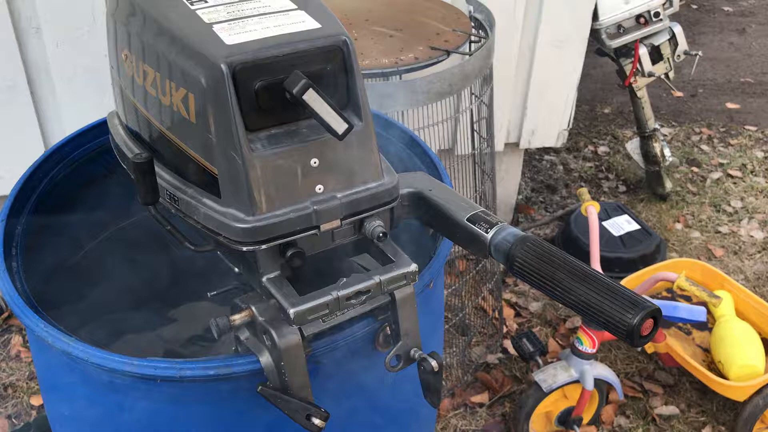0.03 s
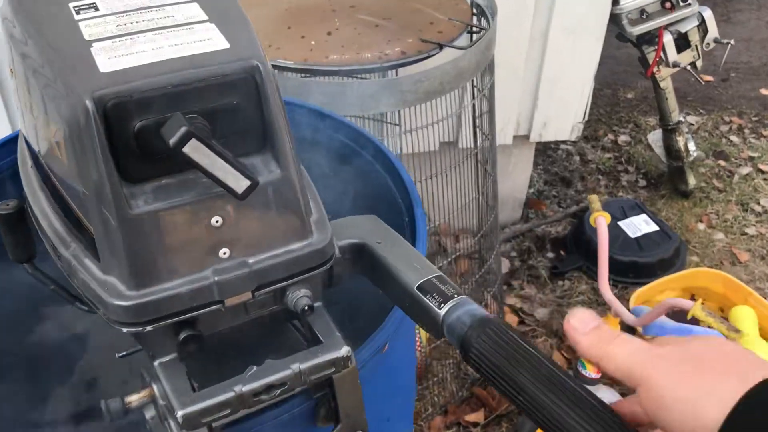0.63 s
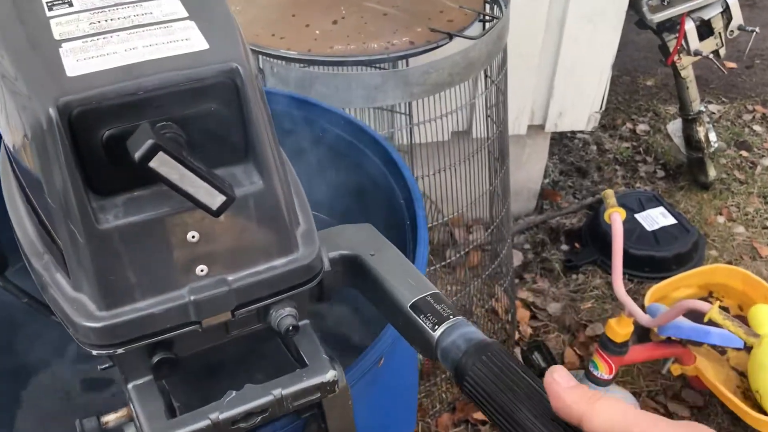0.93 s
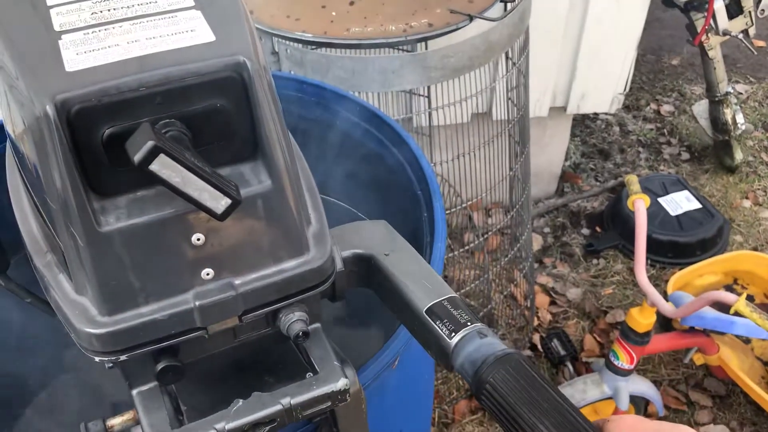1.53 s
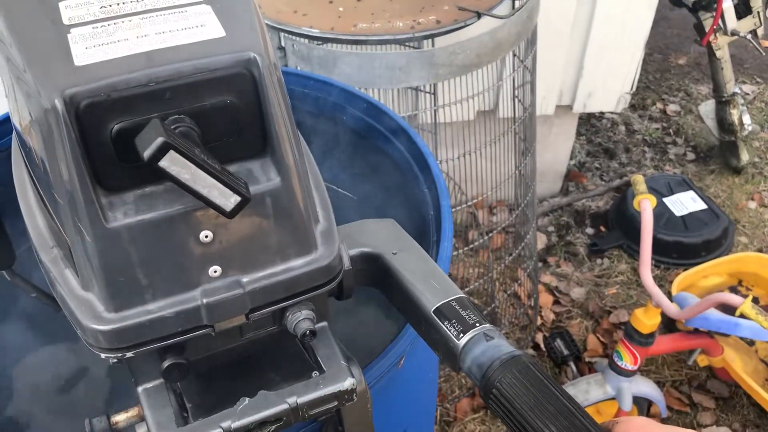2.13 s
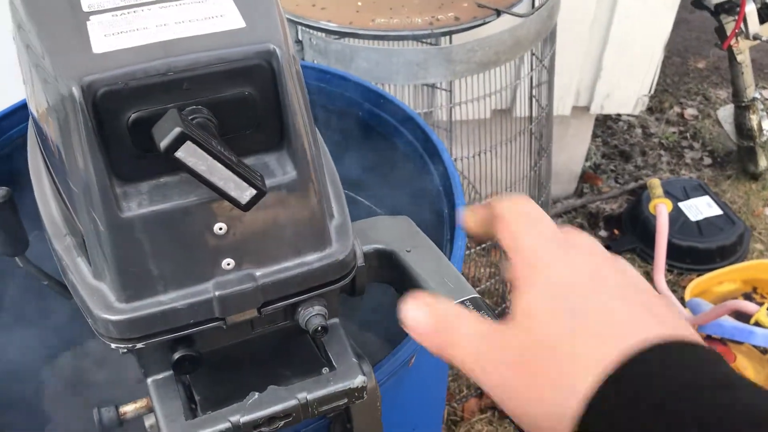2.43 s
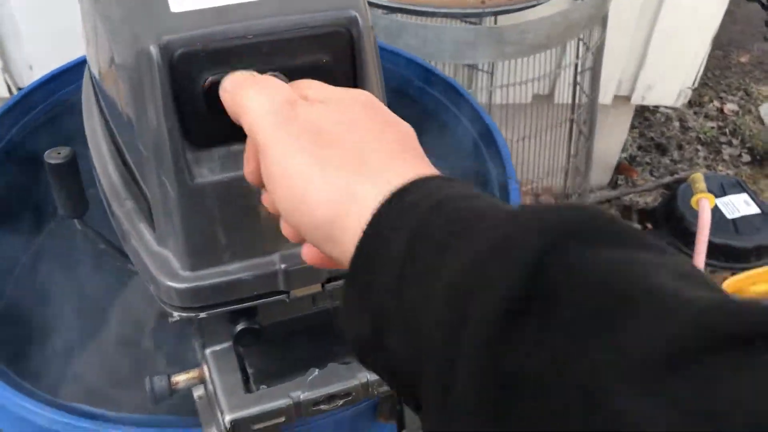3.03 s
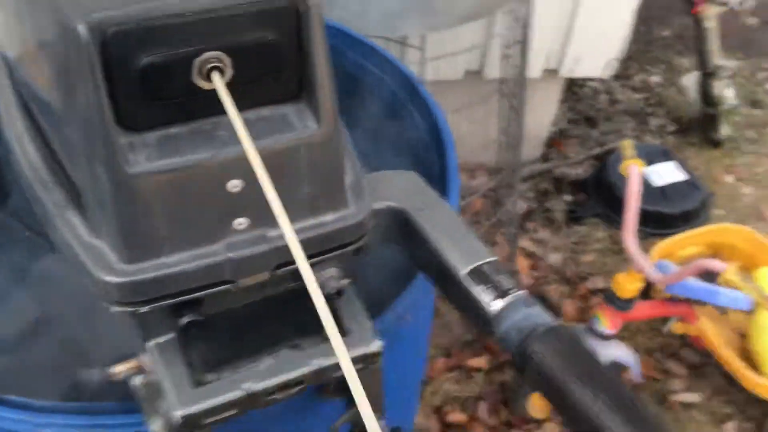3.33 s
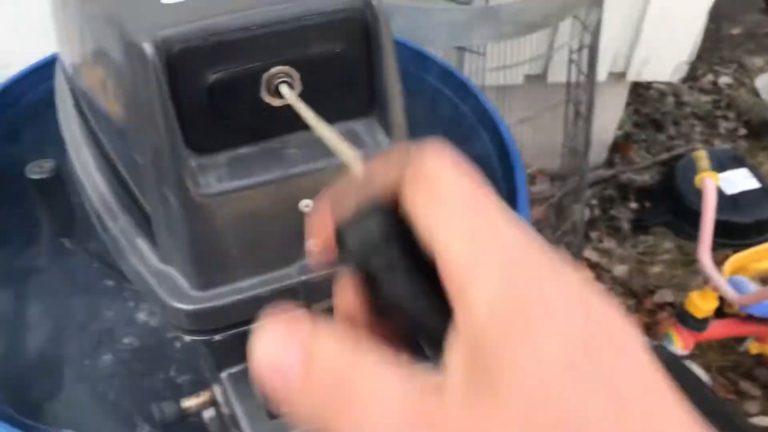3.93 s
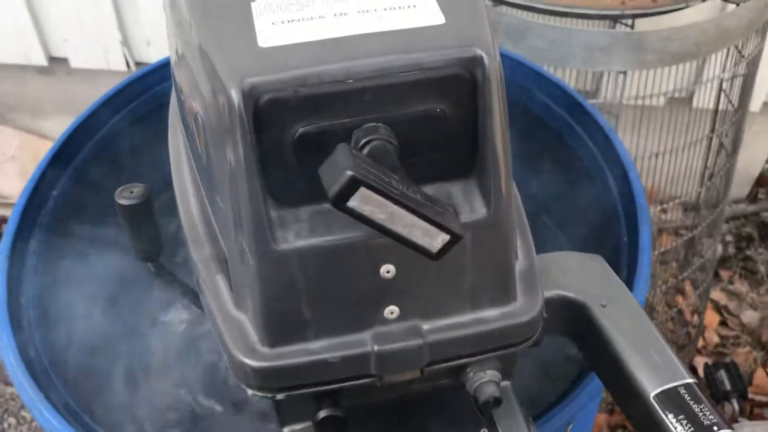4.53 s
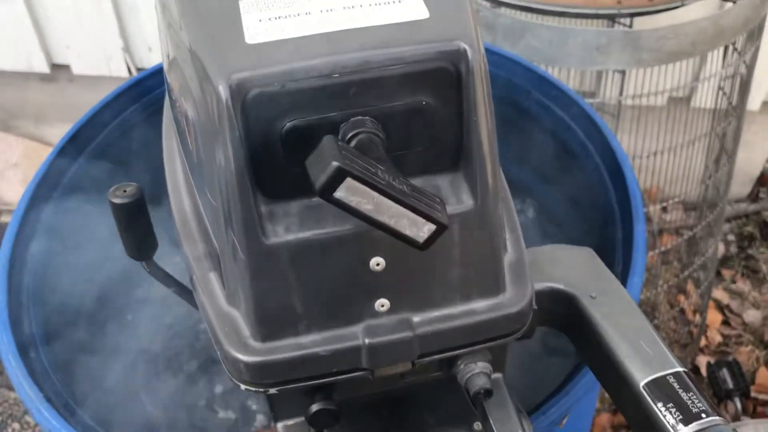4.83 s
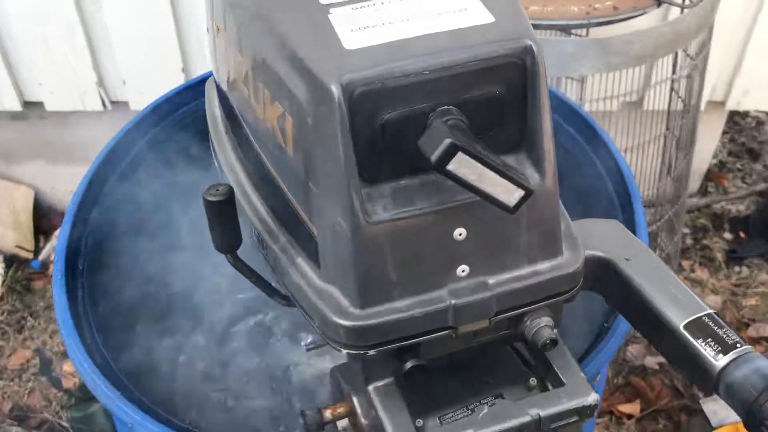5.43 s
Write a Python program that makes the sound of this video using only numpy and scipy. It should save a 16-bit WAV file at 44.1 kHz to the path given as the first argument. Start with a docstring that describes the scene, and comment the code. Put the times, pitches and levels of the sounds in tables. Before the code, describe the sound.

After soft birdsong and light finger taps, a starter cord zips and a two-stroke outboard fires up, clacking and bubbling in water.

```python
"""Small birds call in a quiet yard; a sleeve rustles and fingers tap on a small two-stroke outboard
clamped in a water barrel. Then it is pull-started: the pawls catch, the rope sings out and rewinds,
and the engine flares and sinks to an uneven idle, its loudness set by speed and effort.
Every turn sends a pressure pulse, and each firing clacks the loose drive under the cowl,
then booms in the barrel about one turn later."""
import sys
import numpy as np
from scipy import signal
from scipy.fft import rfft, irfft
from scipy.io import wavfile
from scipy.ndimage import uniform_filter1d

SR = 44100
rng = np.random.default_rng(int(sys.argv[2]) if len(sys.argv) > 2 else 0)


def persist_wave(psi):
    """Save psi, clipped to +-1, as 16-bit WAV."""
    counts = np.round(np.clip(psi, -1, 1) * 32767).astype(np.int16)
    wavfile.write(sys.argv[1], SR, np.atleast_2d(counts).T)


N = 251370
T = np.arange(N) / SR

# The engine's firings. Each row: start in seconds, relative clack level in dB, the clack's brightest
# pitch in Hz, relative boom level in dB, boom pitch in Hz.
FIRINGS = [(4.075, -14, 8200, -13, 219.1), (4.105, -13, 1400, -11, 219), (4.133, -12, 7110, -20, 220),
           (4.161, -9, 3600, -7, 176.6), (4.19, -11.5, 2480, -9.5, 166), (4.219, -10.5, 2370, -9.5, 234.6),
           (4.288, -13, 2450, -9.5, 188.9), (4.331, -10, 2330, -9.5, 220.4), (4.371, -9, 3170, -9.5, 227),
           (4.41, -9, 4300, -9, 215.3), (4.448, -10.5, 5570, -7, 234.8), (4.514, -14, 4500, -10.5, 241.5),
           (4.708, -13, 6500, -6.5, 241), (4.84, -26, 4000, -10, 263.4), (4.88, -28, 4045, -12, 255),
           (4.92, -17, 1896, -15.5, 240.1), (4.936, -12, 2700, -13.5, 241.8), (5.024, -43, 2000, -11, 242),
           (5.129, -32, 2700, -10, 236.3), (5.208, -21, 2430, -8.5, 235.6),
           (5.262, -23.5, 3500, -24, 238.5), (5.288, -21, 7500, -10, 250), (5.341, -13, 3510, -10, 235),
           (5.43, -12.5, 9900, -5.5, 253.2), (5.53, -15.5, 3917, -8.5, 250.2),
           (5.609, -15.5, 5850, -11.5, 234), (5.691, -11, 3105, -10, 239.8)]
# Tone colours. Each row: frequency in Hz, relative level in dB.
CHURN = [(50, -48), (90, -0.5), (170, 6), (260, 2.5), (370, 1.5), (480, -4.5), (650, -1), (850, -4.5),
         (1130, -1.5), (1400, -6.5), (2000, -7.5), (3000, -13), (6000, -41)]  # churning water, also the dull body of knocks
WHIRR = [(600, -10.5), (1800, -0.5), (2700, -1), (4000, 0), (5000, -5.5), (7000, -2), (8300, -9),
         (9100, -5), (10300, -14.5), (12200, -9), (15500, -18)]  # spinning gears and hissing rope
CLACK = [(700, -54), (1800, 0.5), (2700, -6.5), (4000, -1), (5000, -2), (7500, -1), (10300, -5.5),
         (13000, -7), (15500, -7)]  # hard, bright contacts


def piston(turns, hz, count=36):
    """One pressure pulse a turn: a steady bass under a fluttering edge that stands out while coasting."""
    # The pulse's tone. Each row: frequency in Hz, relative level in dB.
    pulse_tone = [(25, -4), (50, 4.5), (74, 2.5), (98, -7), (120, -5), (145, 3.5), (215, 2.5), (290, -8.5),
                  (400, -18), (520, -12.5), (700, -26), (1200, -15), (1800, -19.5), (2400, -56)]
    harmonics = [harmonic_gain(pulse_tone, k * hz) * np.cos(2 * np.pi * k * turns)
                 for k in range(1, count + 1)]
    bass, edge = sum(harmonics[:3]), sum(harmonics[3:])
    edge *= undb(loudness(hz, cruise_db=-1.31, octave_db=2.7, effort_db=-8) + 2 * walk(60))
    level = undb(loudness(hz, cruise_db=-23.5, octave_db=22, effort_db=2.5) + 0.5 * walk(40))
    return (bass + edge) * level * fade_in(3.5, 0.05)


def pockets(hz, lag_turns=1.0246):
    """Gas blown under water: puffs of air from cranking, then a pocket about a turn after each firing."""
    # Cranking puffs. Each row: start in seconds, relative level in dB, boom pitch in Hz.
    puffs = [(3.393, -17.5, 206), (3.473, -15, 201.6), (3.55, -11.5, 230), (3.582, -11, 237),
             (3.644, -13, 233), (3.716, -8.5, 205), (3.775, -9.5, 230.4)]
    fired = [(s + lag_turns / np.interp(s, T, hz), db, boom_hz) for s, _, _, db, boom_hz in FIRINGS]
    return list(puffs) + fired


def booms(gas, glide_per_s=0.78):
    """Each gas pocket in the barrel swells, rings and rises in pitch."""
    out = np.zeros(N)
    for s, db, hz in gas:
        t = np.maximum(T - s, 0)
        cycles = hz * (t + glide_per_s * t * (t - 0.03))
        out += undb(db - 3.5) * swell(s, rise=0.011) ** 0.7 * np.sin(2 * np.pi * cycles)
    return out


def burble(gas):
    """Each pocket rolls up through the water and keeps the barrel humming in uneven lumps."""
    # The barrel's resonances. Each row: frequency in Hz, relative level in dB.
    barrel_tone = [(60, -55), (110, -23), (170, -7), (210, -5), (245, 3.5), (275, -2), (320, -22),
                   (385, -11), (460, -12), (900, -47)]
    stir = np.sqrt(sum((undb(db) * swell(s, rise=0.044)) ** 2 for s, db, _ in gas))
    return colour(noise(), barrel_tone) * stir * undb(-15.5 + 0.55 * walk(25))


def gurgles(count=7):
    """Exhaust breaks the surface in clusters of bubbles that ring briefly and glide upwards."""
    # Each row: start in seconds, level in dB, typical bubble pitch in Hz, cluster length in seconds.
    clusters = [(3.597, -17.5, 483, 0.084), (3.645, -18.5, 830, .03), (4.101, -15, 630, .045),
                (4.518, -20.5, 695, 0.024), (4.697, -17, 658, 0.055), (4.909, -20.5, 760, 0.043),
                (5.045, -21.5, 1100, 0.04), (5.104, -24.5, 2748, 0.044), (5.21, -24, 810, 0.045),
                (5.282, -18.5, 754, 0.062)]
    out, t = np.zeros(N + SR), T[:SR // 20]
    for s, db, typical_hz, length in clusters:
        for k, (when, pick) in enumerate(rng.random((count, 2))):
            hz = typical_hz * 2 ** (0.5 * (pick - 0.5))
            cycles = hz * t
            shape = np.exp(-cycles / 6.2) * (1 - np.exp(-cycles))
            at = int((s + length * (k + when) / count) * SR)
            out[at:at + len(t)] += undb(db) * shape * np.sin(2 * np.pi * cycles * (1 + 2 * t))
    return out[:N]


def intake(turns, hz, count=26):
    """Each gulp of air rings the air box, so the crank's harmonics climb through its resonances."""
    # Each row: frequency in Hz, relative level in dB.
    airbox_tone = [(90, -48), (140, -1.5), (190, -13), (230, 6.5), (290, -4), (355, 3), (430, -11),
                   (530, -19), (620, 3), (710, -3.5), (800, -9), (1300, -16), (1700, -34), (3500, -42)]
    growl = sum(harmonic_gain(airbox_tone, k * hz) * np.cos(2 * np.pi * (k * turns + rng.random()))
                for k in range(2, count))
    growl /= np.sqrt(uniform_filter1d(growl ** 2, SR // 8) + 1e-6)  # even out the level
    level = undb(loudness(hz, cruise_db=-34.5, octave_db=10.5, effort_db=15) + 2.1 * walk(50))
    return growl * level * fade_in(3.52, 0.083)


def clacks():
    """Slack parts of starter and drive clack; each knock sings in its own band and rings the cowl."""
    # Pawls and rope drum. Each row: start in seconds, relative level in dB, brightest pitch in Hz.
    starter_knocks = [(3.235, -32, 8000), (3.27, -31, 1460), (3.298, -16.5, 1380), (3.454, -20, 5850),
                      (3.488, -13.5, 1430), (3.5, -18, 1850), (3.547, -17, 4200), (3.585, -16.5, 4370),
                      (3.619, -23.5, 3950), (3.652, -15, 3495), (3.758, -13, 6395), (3.779, -18.5, 5730),
                      (3.8, -14.5, 7000)]
    rattle, blow, sing = np.zeros((3, N))
    hiss = noise()
    for s, db, hz, *_ in list(starter_knocks) + list(FIRINGS):
        force = undb(db) * swell(s, rise=0.0053)
        rattle += force
        blow += force * undb(1 - 3 * np.log2(hz / 3020))  # duller knocks ring the cowl more
        sing += force * resonate(hiss, hz, q=4.5)
    body = 0.53 * cowl(blow * noise()) + 0.85 * blow * colour(noise(), CHURN)
    contacts = colour(mottle(grit(0.65), spread_db=4.4, size=384), CLACK)
    return undb(-9.5) * rattle * contacts + undb(-6) * body + undb(-10.5) * sing


def churn(turns, hz):
    """Exhaust churns the water in puffs that follow the crank."""
    beat = np.cos(2 * np.pi * turns)
    puffs = mottle(noise(), spread_db=7.2, size=768) * undb(0.95 * beat + 2.9 * walk(45))
    water = colour(unit(puffs) + 0.5 * per_turn(turns, drift=4), CHURN)
    return water * undb(loudness(hz, cruise_db=-25, octave_db=8.9, effort_db=7.9))


def whirr(turns, hz):
    """Gears, bearings and the starter spool whirr, partly alike on every turn."""
    teeth = mottle(grit(3.4), spread_db=4.1, size=256)
    teeth *= undb(3.1 * per_turn(turns, drift=5, size=12) + 1.4 * walk(300))
    spool = undb(-31) * envelope(start=3.435, attack=0.012, hold=0.4, fade=0.6)
    # The unloaded gears chatter while the engine coasts.
    chatter = undb(-29.5) * envelope(start=4.62, attack=0.1, hold=0.23, fade=0.39)
    running = undb(loudness(hz, cruise_db=-30, octave_db=15.7, effort_db=6.4))
    gears = echoes(teeth, t60=0.029, wet_db=-7) + 0.43 * per_turn(turns, drift=6)
    return colour(gears, WHIRR) * np.hypot(running, spool + chatter) * undb(walk(40))


def machinery(turns, hz):
    """Churn and whirr come in with the pull and set the cowl ringing softly."""
    running = churn(turns, hz) + whirr(turns, hz)
    return (running + undb(-11.5) * cowl(running)) * fade_in(3.235, 0.025)


def cowl(x):
    """Cowl and leg ring; the balance of their modes wanders as different places are struck."""
    # Each row: pitch in Hz, relative level in dB, seconds to fade by 60 dB.
    modes = [(342, -26, 0.14), (646, -25, 0.072), (1070, -5, 0.095), (1170, 7, 0.098), (1384, 5.5, 0.024),
             (1844, -1.5, 0.14), (2130, 0, 0.024), (2434, 4.5, 0.051), (2760, -7, 0.11), (3260, -2, 0.064),
             (3710, -7, 0.076), (4300, -1, 0.098)]
    out = 0
    for hz, db, t60 in modes:
        pole = np.exp((2j * np.pi * hz - np.log(1000) / t60) / SR)
        ring = signal.lfilter([1], [1, -pole], x + 1e-12).imag
        out += undb(db + 5.1 * walk(14)) * ring
    return unit(out) * np.std(x)


def leg(turns):
    """During the hardest firings one resonance of the leg shakes and throbs with the crank."""
    shake = envelope(start=4.15, attack=0.016, hold=0.13, fade=0.3)
    throb = undb(-29.5 + 1.5 * np.cos(2 * np.pi * turns))
    return resonate(noise(), hz=1185, q=16) * shake * throb


def clunk():
    """The pawls ping into the flywheel, take the load and jolt the whole motor on its bracket."""
    # Each row: start in seconds, peak level in dB, pitch in Hz.
    pawl_drops = [(3.237, -43, 13750), (3.269, -42, 14600), (3.298, -33, 15000)]
    pings = sum(undb(db) * swell(s, rise=0.005) * sine(hz) for s, db, hz in pawl_drops)
    shudder = undb(-28.5) * swell(3.3, rise=0.013) * colour(noise(), CHURN)
    thud = undb(-20.5) * sine(160) + undb(-26) * sine(340)
    return pings + shudder + swell(3.302, rise=0.0076) * thud


def rope(hz, cycles_per_turn=47):
    """The cord hisses over its guide and sings, its pitch rising with the speed of the crank."""
    pitch = cycles_per_turn * hz * (1 + 0.0468 * walk(400))
    phase = 2 * np.pi * np.cumsum(pitch) / SR
    song = undb(-36.5 + 2.7 * walk(150)) * (np.sin(phase) + 0.45 * walk(250) * np.sin(2 * phase))
    hiss = undb(-47) * colour(noise(), WHIRR)
    return (song + hiss) * envelope(start=3.27, attack=0.019, hold=0.19, fade=0.22)


def recoil(turns):
    """A bright zip: the pawls scrape and tinkle once a turn until the rope is home."""
    # Each row: frequency in Hz, relative level in dB.
    pawl_tone = [(3500, -18), (6000, -31), (8400, 0.5), (10200, -6), (12600, 0.5), (14000, -4),
                 (15800, -5.5)]
    scrape = mottle(grit(2.7), spread_db=5.2, size=192) * undb(3.55 * np.cos(2 * np.pi * turns))
    rewind = envelope(start=3.755, attack=0.071, hold=0.19, fade=0.31)
    return undb(-25.5) * colour(scrape, pawl_tone) * rewind


def hand():
    """A sleeve rustles, fingers tick on plastic, and the starter grip knocks against the hollow cowl."""
    # Touches on tiller and grip. Each row: start in seconds, relative level in dB, knock offset in dB.
    touches = [(2.292, -38, -25), (2.316, -37, -25), (2.4, -44, -25), (2.637, -41, -14), (2.788, -41, 6)]
    # The sleeve brushing past. Each row: start in seconds, relative level in dB, rise in seconds.
    brushes = [(2.28, -63, 0.048), (2.7, -63, 0.15)]
    tick = sum(undb(db) * swell(s, rise=0.00055) for s, db, _ in touches)
    knock = sum(undb(db + knock_db) * swell(s, rise=0.0076) for s, db, knock_db in touches)
    tap = sum(undb(db + knock_db) * swell(s, rise=0.0013) for s, db, knock_db in touches)
    hollow = sine(215) + 0.4 * sine(390) + 0.45 * sine(480)
    brush = sum(undb(db) * swell(s, rise) for s, db, rise in brushes)
    cloth = colour(grit(3), [(500, -20), (3000, 3), (15000, -7)]) * brush * undb(-4.5 + 2.9 * walk(40))
    contact = undb(-12.5) * tick * colour(grit(1.2), CLACK) + undb(-4.5) * tap * colour(noise(), CHURN)
    return contact + undb(-7.5) * knock * hollow + cloth


def whistle(start, length, hz, glide, db, arch, rasp):
    """One thin bird note, roughened by pitch scatter; its ends droop `arch` octaves under its glide."""
    u = np.linspace(0, 1, int(length * SR))
    pitch = hz * 2 ** (glide * (u - 0.5) - arch * (2 * u - 1) ** 2)
    pitch *= 1 + rasp * uniform_filter1d(rng.standard_normal(len(u)), size=24)
    shape = np.abs(np.sin(np.pi * u)) ** 0.24
    note = undb(db - 3.5) * shape * np.sin(2 * np.pi * np.cumsum(pitch) / SR)
    return np.pad(note, (int(start * SR), N))[:N]


def birds(repeats=7, period_s=0.16, chip_sharpness=2.34):
    """Arched whistles, one bird repeating a slightly sagging note, and harsh chips from the trees."""
    # Each row: start and length in seconds, pitch in Hz, glide in octaves, relative level in dB.
    whistles = [(.263, 0.032, 2160, 0.0036, -50.5), (0.389, 0.069, 2400, -.12, -50.5),
                (.435, .093, 5930, -.1, -62), (.525, .04, 3800, -0.14, -54), (.66, .025, 3750, -.23, -51),
                (.745, .028, 3620, -.31, -53), (0.801, 0.06, 3860, 0.35, -50),
                (.852, 0.071, 4530, -0.046, -53), (.96, 0.061, 8400, -0.052, -66),
                (1.08, 0.059, 8450, -0.056, -66), (1.191, .04, 6750, .16, -61),
                (1.21, 0.031, 5500, 0.58, -59), (1.29, 0.045, 6140, 0.25, -54),
                (1.585, 0.063, 4720, 0.0013, -61), (1.692, .026, 4530, .39, -58),
                (1.99, .041, 6050, .25, -60), (2.34, .045, 5300, -.25, -63), (2.432, 0.02, 4600, 0.18, -58),
                (2.726, 0.05, 6120, .14, -58), (3.075, .04, 5400, 0, -67), (3.172, 0.027, 4950, .19, -65)]
    # Each row: start in seconds, level in dB, rise in seconds.
    chips = [(.567, -48.5, 0.03), (1.378, -47, .019), (2.076, -46.5, 0.018), (2.815, -48, 0.018)]
    # Each row: frequency in Hz, relative level in dB.
    chip_tone = [(2800, -20.5), (3700, -7.5), (4400, 4), (5200, -7), (6500, -12.5), (8500, -22),
                 (11000, -34), (14000, -38)]
    song = sum(whistle(*row, arch=0.082, rasp=0.11) for row in whistles)
    song += sum(whistle(0.56 + k * period_s, length=0.105, hz=4660, glide=-0.025, db=-62,
                        arch=0, rasp=0.04) for k in range(repeats))
    song *= undb(3.7 * walk(200))
    bursts = sum(undb(db) * swell(s, rise) ** chip_sharpness for s, db, rise in chips)
    chipping = bursts * colour(noise(), chip_tone) * undb(3.1 * walk(400))
    return echoes(song + chipping, t60=0.24, wet_db=-8.5)


def twitter():
    """A flock further off blurs into a faint high hiss that fades away."""
    band = signal.sosfilt(signal.butter(2, [3400, 8000], "band", fs=SR, output="sos"), noise())
    flock = envelope(start=0, attack=0.5, hold=-0.29, fade=6)  # the fade overlaps the attack
    return mottle(band, spread_db=3.6, size=512) * undb(-66 + 2.4 * walk(30.5)) * flock


def yard():
    """Soft outdoor air with the wavering hum of distant machinery."""
    # Each row: frequency in Hz, relative level in dB.
    air_tone = [(15, -35), (25, -17), (64, 1.5), (164, -12), (209, -16.5), (253, -9.5), (313, -17.5),
                (523, -17), (762, -22), (945, -16), (1620, -18.5), (2920, -28), (4500, -35), (7700, -44.5),
                (15500, -44)]
    # Each row: pitch in Hz, level in dB.
    hum_tones = [(52, -52.5), (117, -58), (170, -60.5)]
    air = colour(noise(), air_tone) * undb(-54.5 + 0.5 * walk(5.05))
    hum = sum(undb(db + 2 * walk(9.8)) * np.sin(2 * np.pi * np.cumsum(hz + 1.82 * walk(18)) / SR)
              for hz, db in hum_tones)
    return air + hum


def loudness(hz, cruise_db, octave_db, effort_db, cruise_hz=70):
    """Level in dB of a running sound: its cruising level, shifted per octave of speed and by effort."""
    # How hard the engine is driven. Each row: time in seconds, effort from 0 to 1.
    effort = [(3.5, 0.4), (3.62, 1), (4.08, 1), (4.22, .55), (4.5, 0), (4.6, 0), (5.3, 0.26), (5.7, 0)]
    return cruise_db + octave_db * np.log2(hz / cruise_hz) + effort_db * curve(effort)


def undb(db):
    """Decibels to gain."""
    return 10 ** (np.asarray(db) / 20)


def unit(x):
    """Scale to rms 1."""
    return x / np.sqrt(np.mean(x ** 2) + 1e-18)


def curve(points):
    """Join (seconds, value) points by straight lines."""
    return np.interp(T, *np.transpose(points))


def fade_in(start, length):
    """A straight ramp from silence to full level."""
    return np.clip((T - start) / length, 0, 1)


def envelope(start, attack, hold, fade):
    """Attack, hold and a release that drops 60 dB in `fade`; all in seconds."""
    released = np.maximum(T - start - attack - hold, 0)
    return fade_in(start, attack) * np.exp(-np.log(1000) * released / fade)


def swell(start, rise):
    """An envelope that peaks `rise` seconds after its start and dies away."""
    u = np.maximum(T - start, 0) / rise
    return u * np.exp(1 - np.minimum(u, 50))


def sine(hz):
    """A steady pure tone."""
    return np.sin(2 * np.pi * hz * T)


def noise():
    """White noise."""
    return rng.standard_normal(N)


def walk(rate):
    """A smooth random wobble of rms 1 that takes `rate` new values a second."""
    step = int(SR / rate)
    return unit(uniform_filter1d(np.repeat(rng.standard_normal(N // step + 1), step), step)[:N])


def grit(spread_db):
    """Dense tiny impacts of very unequal size."""
    return unit(noise() * undb(spread_db * np.minimum(rng.exponential(size=N), 5)))


def per_turn(turns, drift, size=256, count=3):
    """A ragged pattern that repeats with every turn of the crank and slowly changes."""
    angle = np.arange(size) / size
    return unit(sum(walk(drift) * np.interp(turns % 1, angle, rng.standard_normal(size), period=1)
                    for _ in range(count)))


def mottle(x, spread_db, size):
    """Many small parts ring briefly at chance pitches: each short moment stresses other bands."""
    bands = signal.stft(x, nperseg=size)[2]
    stress = uniform_filter1d(uniform_filter1d(rng.standard_normal(bands.shape), 2, axis=0), 2, axis=1)
    return unit(signal.istft(bands * undb(spread_db * unit(stress)), nperseg=size)[1][:N])


def gain_at(spectrum, hz):
    """Gain of a (Hz, dB) spectrum on a log-frequency axis."""
    f, db = np.transpose(spectrum)
    return undb(np.interp(np.log(np.maximum(hz, 1)), np.log(f), db))


def harmonic_gain(spectrum, hz):
    """Gain of a harmonic gliding through a spectrum, updated every 100 samples."""
    return gain_at(spectrum, hz[::100]).repeat(100)[:N]


def colour(x, spectrum):
    """Filter by a spectrum; rms 1."""
    return unit(irfft(rfft(x) * gain_at(spectrum, np.arange(N // 2 + 1) * SR / N), N))


def resonate(x, hz, q):
    """Ring one resonance; rms 1."""
    return unit(signal.lfilter(*signal.iirpeak(hz, q, fs=SR), x))


def echoes(x, t60, wet_db):
    """Add a diffuse tail of reflections."""
    t = T[:SR]
    tail = noise()[:SR] * np.exp(-np.log(1000) * t / t60) * (t > 0.004)
    return x + undb(wet_db) * signal.fftconvolve(x, tail / np.linalg.norm(tail))[:N]


def scene():
    """The crank's speed and angle drive the engine; the house wall throws a little back."""
    # The crank through pull, flare and run-down. Each row: time in seconds, turns per second.
    crank_speed = [(3.27, 5.9), (3.32, 7.2), (3.39, 18.2), (3.44, 19.4), (3.47, 23.6), (3.6, 28.8),
                   (3.81, 48.1), (3.99, 65.4), (4.09, 67.6), (4.49, 75.4), (4.97, 64.8), (5.16, 58.3),
                   (5.7, 46.5)]
    hz = curve(crank_speed)
    turns = np.cumsum(hz) / SR
    gas = pockets(hz)
    exhaust = piston(turns, hz) + booms(gas) + burble(gas) + gurgles()
    works = machinery(turns, hz) + clacks() + rope(hz) + recoil(turns) + leg(turns) + clunk()
    outboard = exhaust + intake(turns, hz) + echoes(works, t60=0.19, wet_db=-10)
    return (outboard + hand() + birds() + twitter() + yard())[None]


def record(dry, silent_s=0.118, low_hz=32, top_hz=15900):
    """The sound opens after a moment of silence, its deepest bass and very top cut, its peaks clipped."""
    thinned = signal.sosfilt(signal.butter(2, low_hz, "high", fs=SR, output="sos"), dry)
    clipped = np.clip(thinned, -0.9, 0.9) * (T > silent_s)
    return signal.sosfilt(signal.ellip(10, 0.2, 80, top_hz, fs=SR, output="sos"), clipped)


dry = scene()
out = record(dry)
persist_wave(out)
```